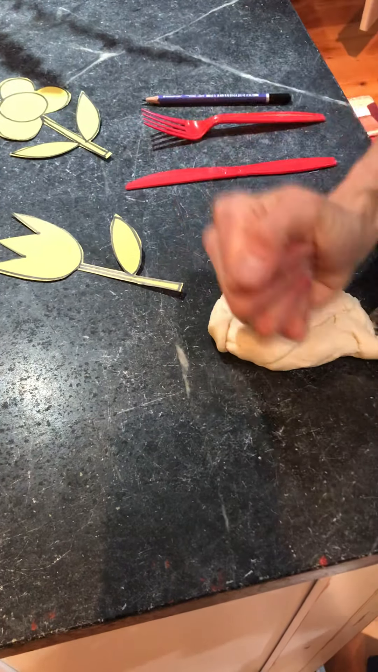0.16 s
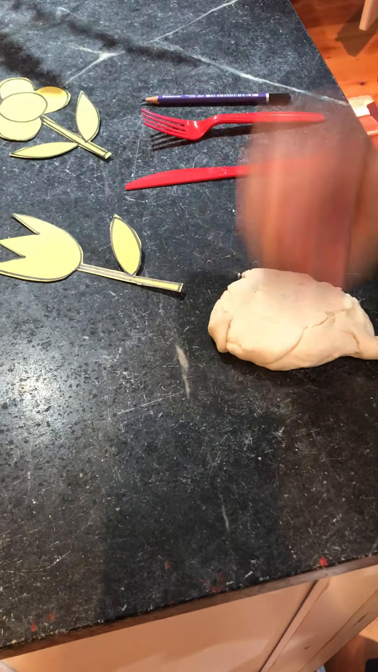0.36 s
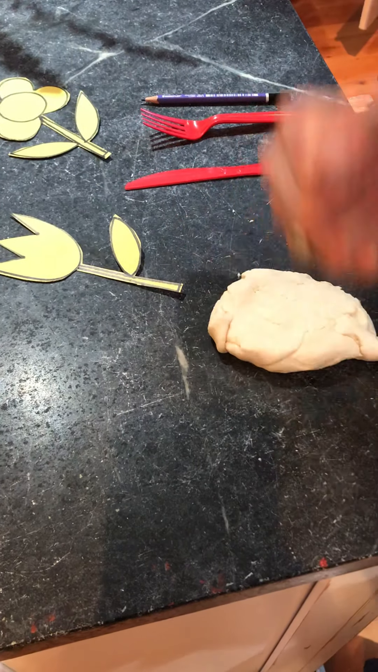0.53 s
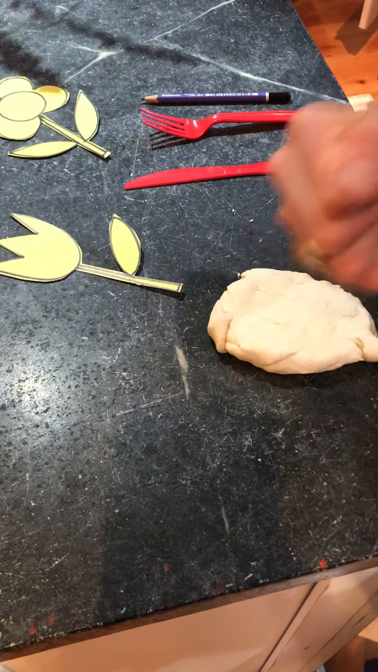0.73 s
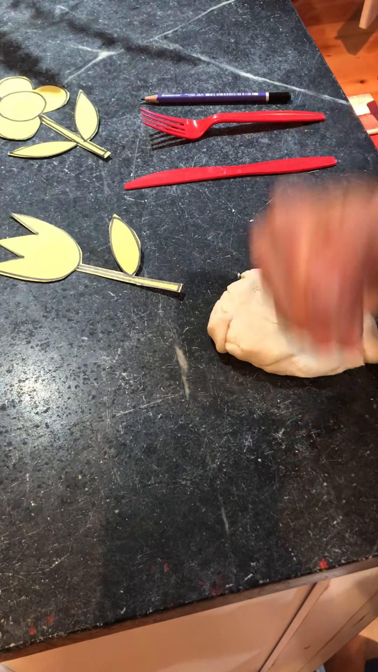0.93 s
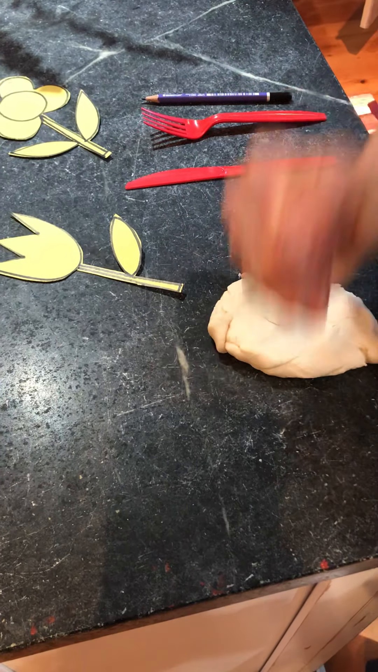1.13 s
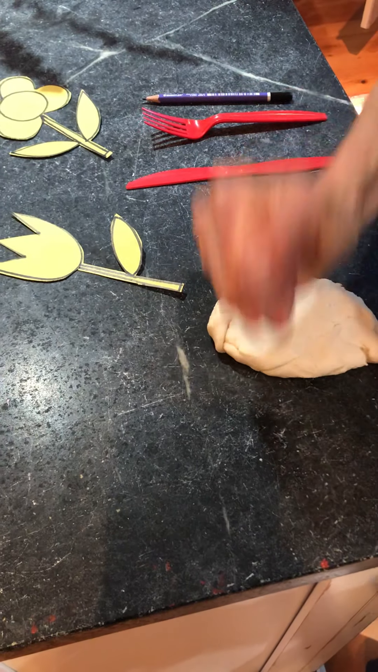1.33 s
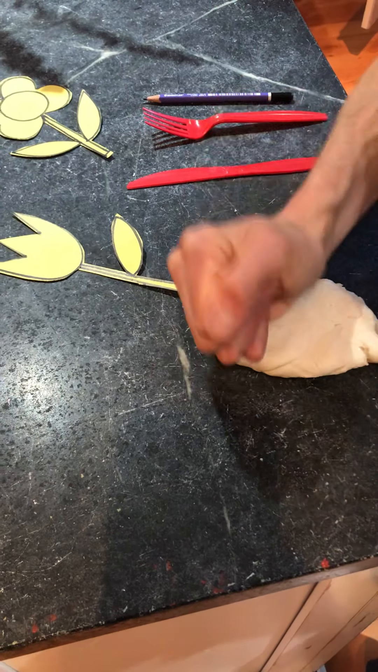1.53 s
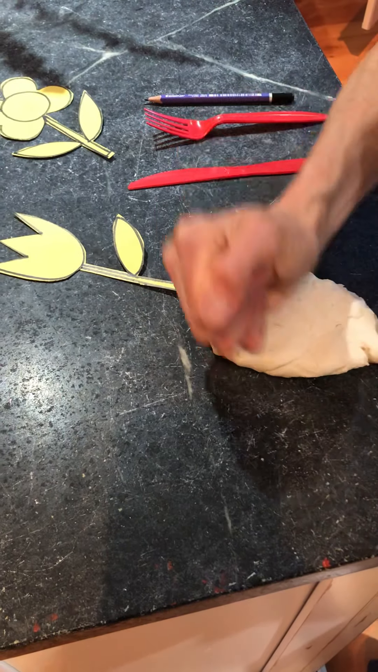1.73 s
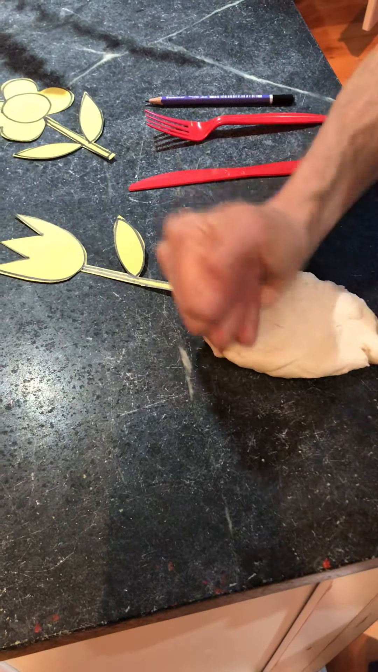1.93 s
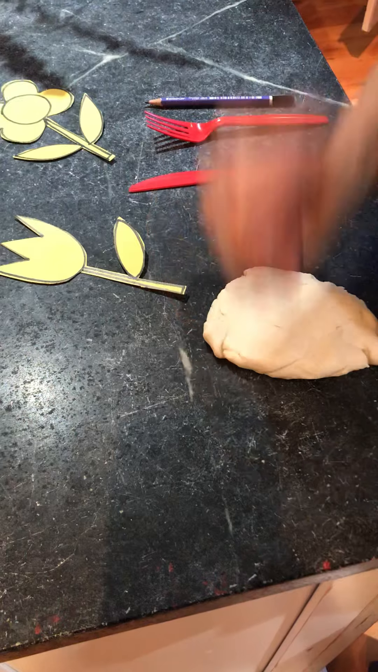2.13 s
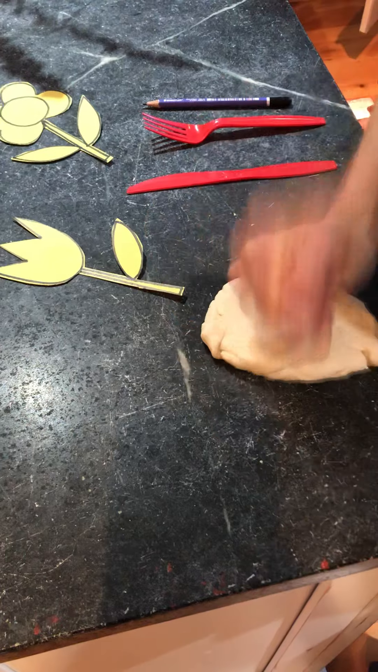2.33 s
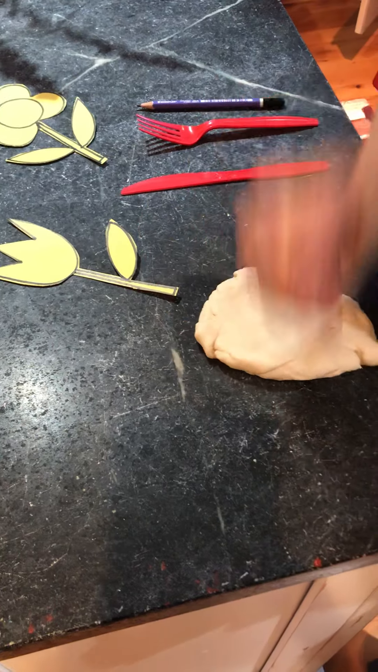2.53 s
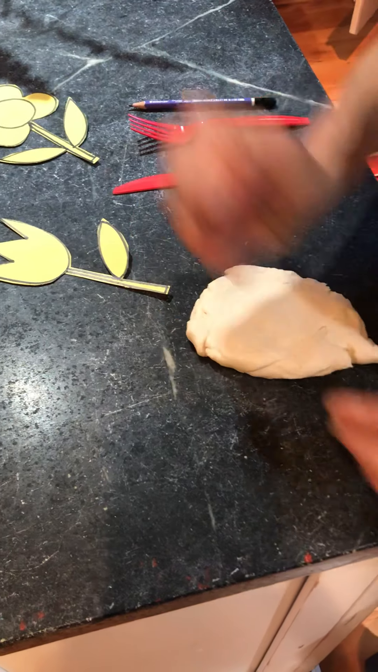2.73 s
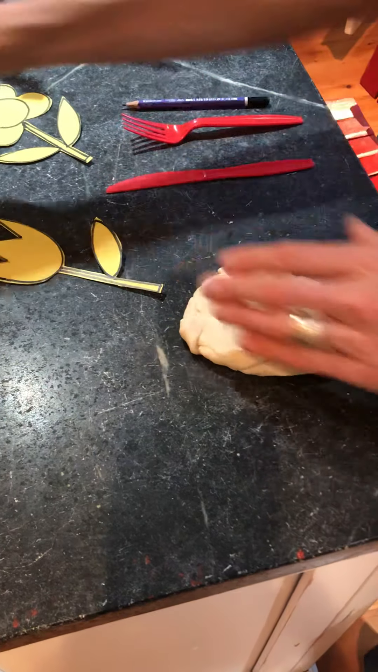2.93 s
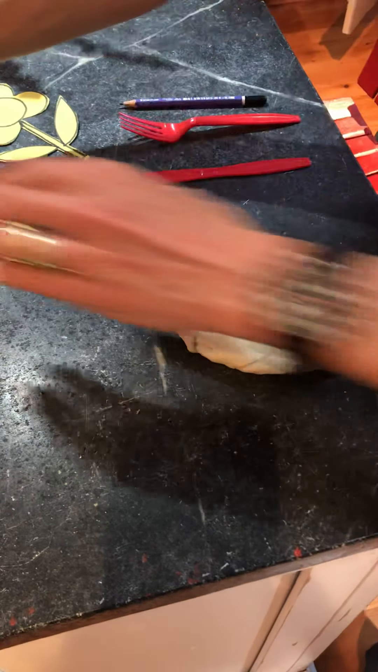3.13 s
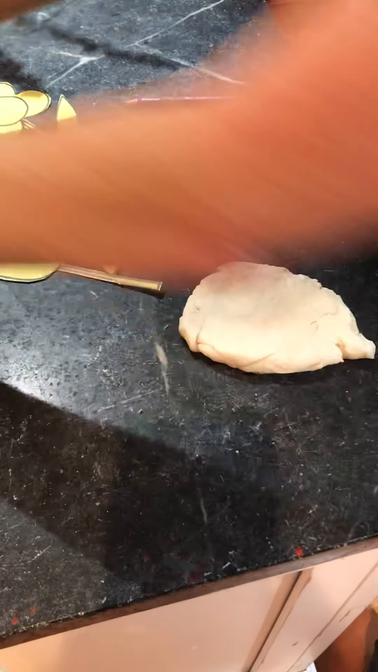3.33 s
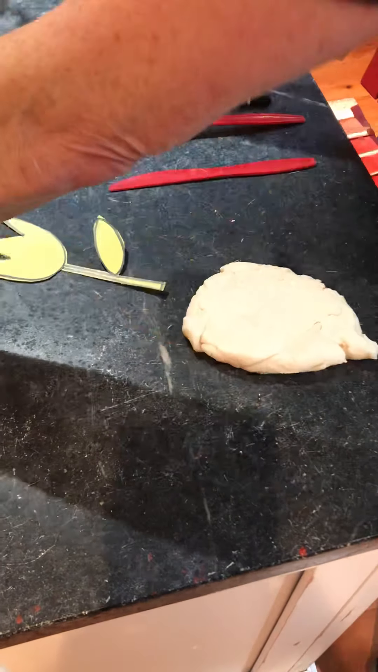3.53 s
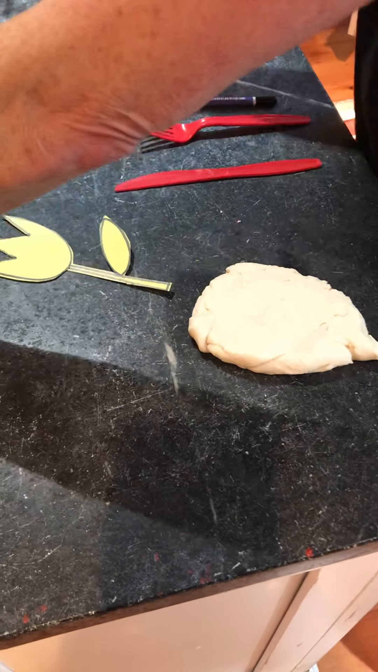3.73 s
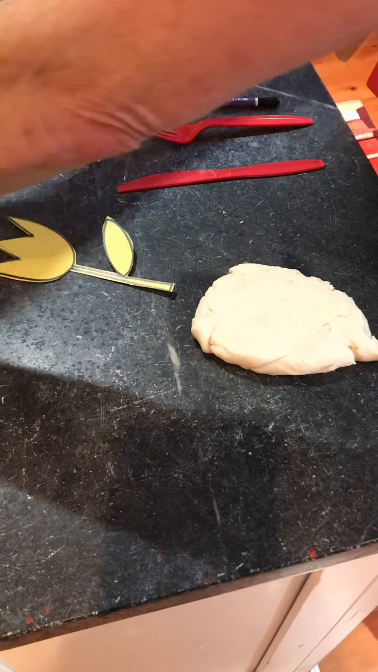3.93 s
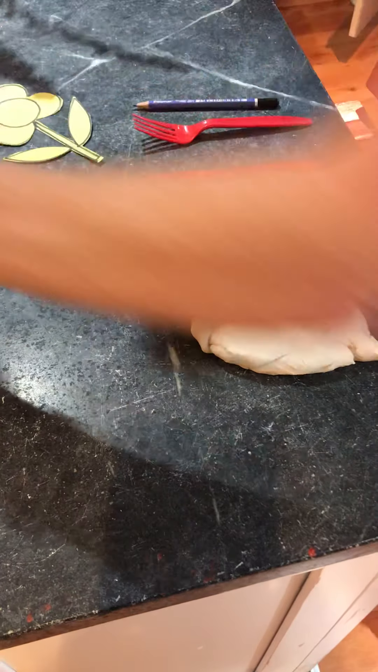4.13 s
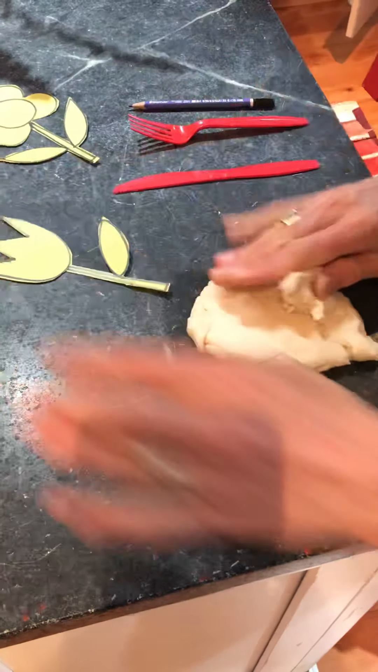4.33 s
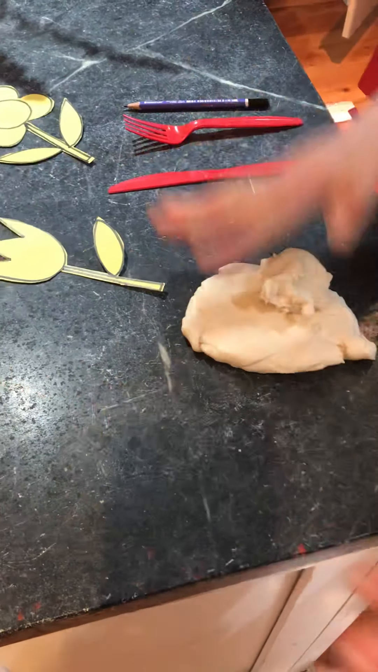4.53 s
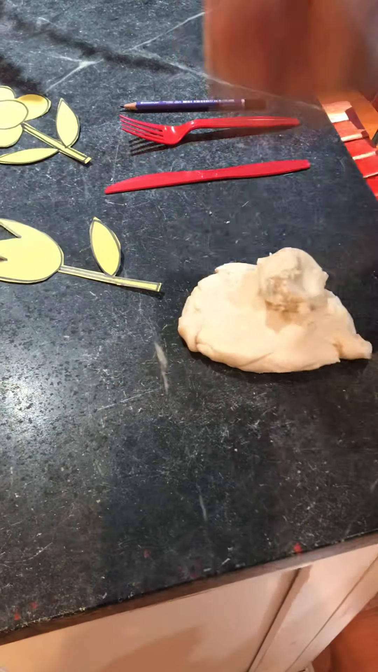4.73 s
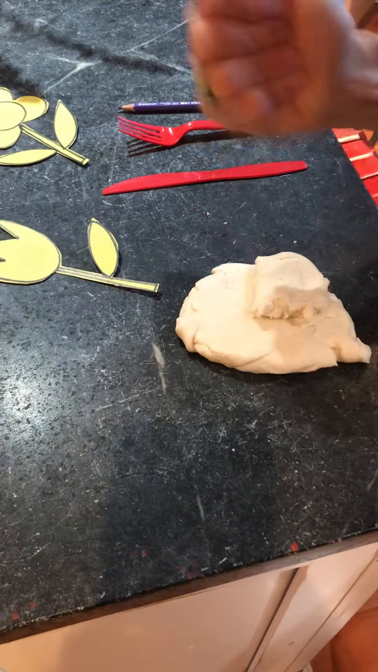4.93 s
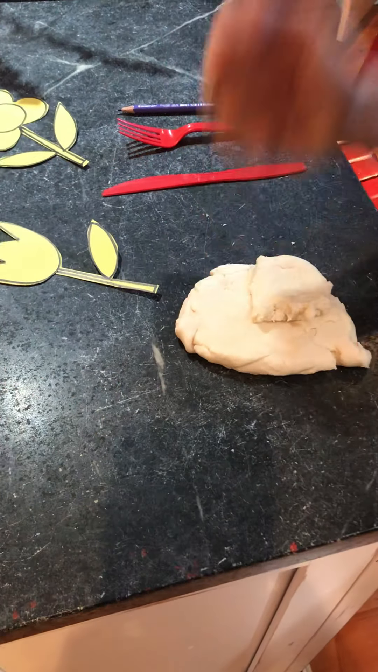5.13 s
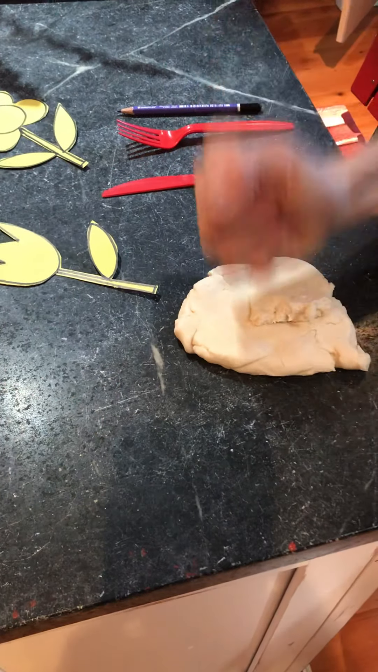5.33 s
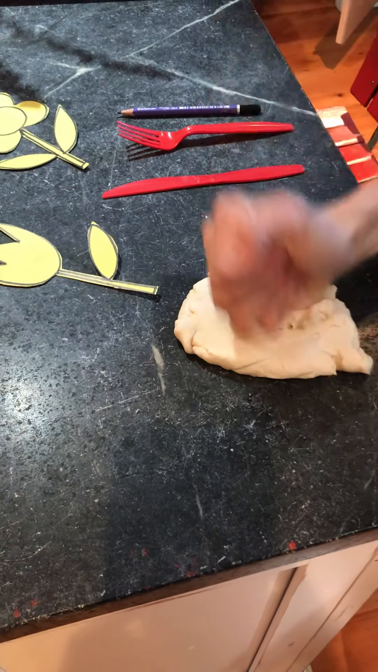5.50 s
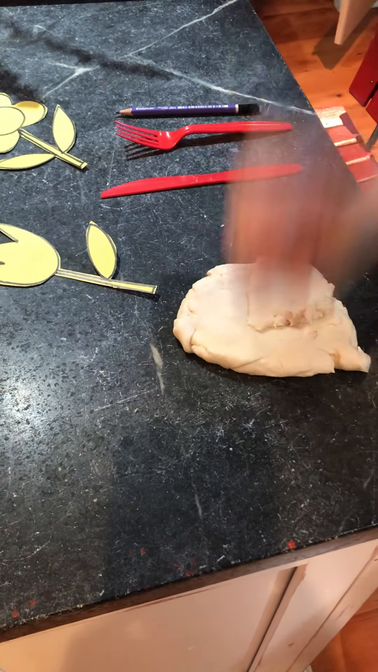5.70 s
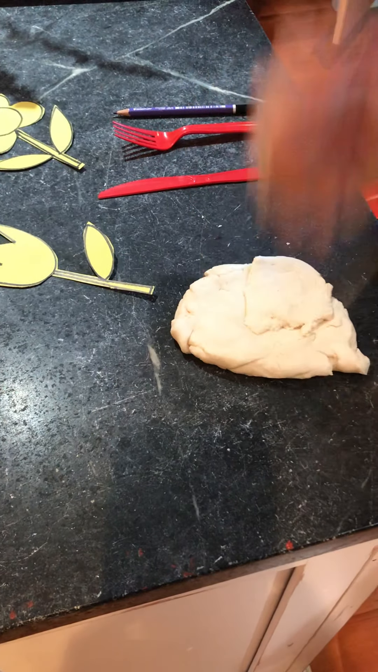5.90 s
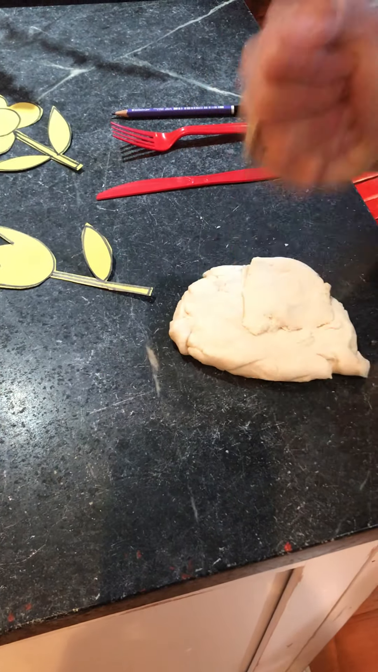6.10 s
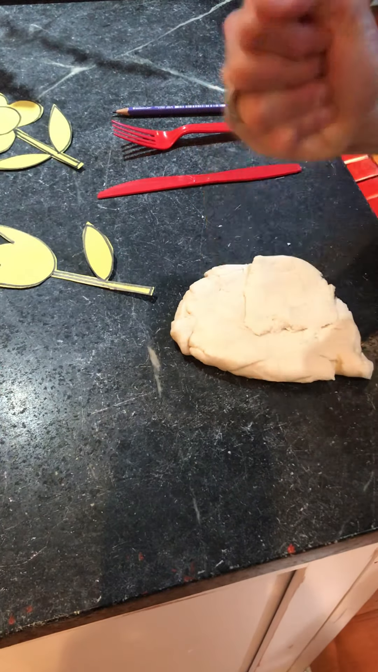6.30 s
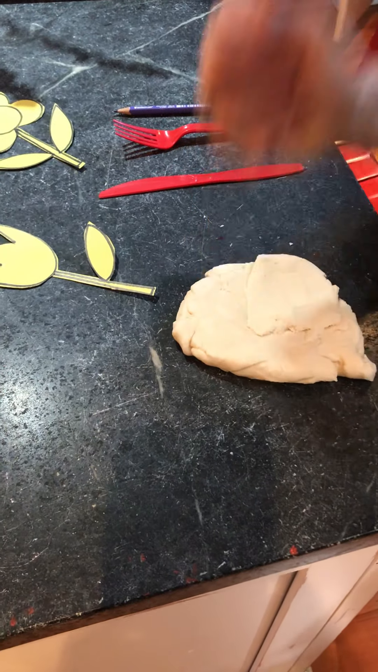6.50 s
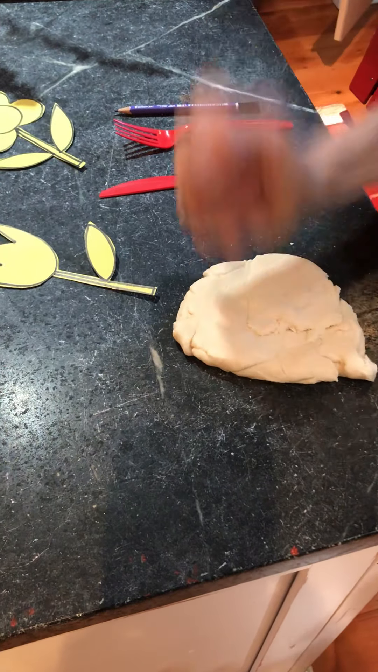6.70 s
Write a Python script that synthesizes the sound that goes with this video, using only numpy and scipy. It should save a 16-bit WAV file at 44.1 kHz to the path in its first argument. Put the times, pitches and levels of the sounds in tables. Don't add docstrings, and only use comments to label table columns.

```python
import sys
import numpy as np
from scipy import signal
from scipy.fft import rfft, irfft
from scipy.io import wavfile
from scipy.ndimage import uniform_filter1d

SR = 44100
rng = np.random.default_rng(int(sys.argv[2]) if len(sys.argv) > 2 else 0)


def ratio(d):
    e = np.asarray(d, float) / 20
    return 10 ** e


def waveform_to_disk(signal):
    frames = np.transpose(np.atleast_2d(signal))
    scaled = np.clip(frames, -1, 1) * 32767
    samples = np.round(scaled).astype(np.int16)
    wavfile.write(sys.argv[1], SR, samples)


N = 302261

# start in seconds, push in dB, skin slap in dB, squeezed air in dB,
# pitch of the hand's hollow in Hz.
PATS = [(0.13, 3.5, -35, -35, 1990), (0.1479, -3, -23.5, -33.5, 1130), (0.377, 4.2, -22, -24.5, 2040),
        (0.6012, 2.6, -24, -27, 2000), (0.829, 2.2, -21.5, -33, 1200), (1.0499, -1, -23.5, -41.5, 1140),
        (1.273, -2, -23.5, -30, 1020), (1.4834, -1.5, -19.5, -29.5, 1090), (1.704, 1, -14, -20, 1070),
        (1.92, 0, -22.5, -36.5, 890), (2.144, -4, -17.5, -29.5, 953), (2.3532, 2.1, -23.5, -27.5, 1280),
        (2.5688, -1.5, -24, -29, 1190), (4.7598, 3, -35, -42, 1060), (4.7644, -14, -34.5, -38, 905),
        (5.0089, 12, -22.5, -32, 1110), (5.2503, 7.5, -16.5, -21.5, 1060), (5.4988, 9, -18, -25, 830),
        (5.7346, 1.5, -24, -36.5, 950), (5.961, 3.5, -20, -22, 1190), (6.1761, 4, -12.5, -28, 1070),
        (6.3908, 1.5, -14, -22, 1100), (6.619, -1.5, -9.5, -27, 1190), (6.8493, 2, -2, -19.5, 1510)]
# contact time in ms, brightest frequency in Hz,
# first touch in dB, room share in dB.
SKIN = [(5.2, 5600, -14, -3), (7.2, 4300, -36, -9.5), (5.17, 5100, -38, -6.5), (4.8, 11000, -35, -3),
        (4.34, 10000, -22, -5), (3.87, 11500, -34, -3.5), (3.54, 4200, -17, -3), (3.75, 9000, -24, -9.5),
        (3.62, 6000, -24, -11.5), (3.9, 7000, -37, -9.5), (3.03, 9800, -57, -10.5), (3.9, 6960, -43, -4),
        (3.31, 10700, -24, -11), (5.27, 4700, -29, -1.5), (3.3, 11000, -15, -16), (6.55, 3000, -40, -8.5),
        (4.77, 13400, -44, -10.5), (5.14, 6100, -17, -4), (4.15, 4600, -35, -6.5), (4.13, 2900, -23.5, -4),
        (3.97, 6900, -58, -9), (3.2, 4300, -22, -9.5), (2.88, 8000, -32, -11.5), (2.4, 6800, -48, -14)]


def evened(x):
    return x / np.sqrt(np.mean(x ** 2) + 1e-20)


def read(points, hz):
    f, value = np.transpose(points)
    return np.interp(np.log(hz + 1), np.log(f + 1), value)


def add(mix, s, sound):
    at = round(s * SR)
    sound = sound[max(-at, 0):]
    part = mix[max(at, 0):][:len(sound)]
    part += sound[:len(part)]


def coloured(x, points):
    gain = ratio(read(points, np.fft.rfftfreq(len(x), 1 / SR)))
    return irfft(rfft(x) * gain, len(x))


def levelled(x):
    z = rfft(x)
    return irfft(z / np.sqrt(uniform_filter1d(abs(z) ** 2, size=45)), len(x))


def below(x, hz):
    taps = signal.firwin(511, hz, window=("kaiser", 9), fs=SR)
    return signal.oaconvolve(x, taps, "same")


def resonate(x, hz, width):
    r = np.exp(-np.pi * width / SR)
    return 2 * signal.lfilter([1 - r], [1, -r * np.exp(2j * np.pi * hz / SR)], x).real


def drift(per_s):
    t = np.arange(N) / SR
    rates = np.geomspace(per_s / 10, per_s, num=12)
    return evened(sum(np.sin(2 * np.pi * (f * t + rng.random())) / np.sqrt(f) for f in rates))


def room(hz_db):
    # frequency in Hz, t60 in seconds.
    decay_times = [(500, 0.91), (1000, 0.46), (2000, 0.34), (5500, 0.23), (14600, 0.17)]
    hz, t, z = signal.stft(rng.standard_normal(SR // 3), SR, nperseg=128)
    decay = ratio(-60 * t / read(decay_times, hz)[:, None])
    tail = signal.istft(z * decay, SR, nperseg=128)[1]
    t = np.arange(len(tail)) / SR
    build_up = (t / 0.0048).clip(0, 1) ** 0.5
    echo = 0.6 * np.exp(-((t - .0135) / 0.0011) ** 2)
    tail = tail * (build_up + echo)
    return coloured(tail / np.linalg.norm(tail), hz_db)


def kitchen():
    # frequency in Hz, density in dB per Hz.
    air_colour = [(20, -74), (40, -17), (50, -10), (110, -5), (140, -19.5), (180, -11), (400, -20.5),
                  (600, -24.5), (800, -21), (1200, -25.5), (2000, -32), (4000, -39), (8000, -47),
                  (16000, -47.5)]
    # resonance in Hz, width in Hz, rms in dB.
    resonances = [(51.2, 10, -59), (69, 12, -58.5), (101.8, 24, -54), (169.5, 7.3, -66.5), (568, 51, -63.5),
                  (612, 50, -60.5), (699.6, 60, -60.5), (925, 49, -66), (1020, 120, -70)]
    # hum frequency in Hz, rms in dB, waver in dB.
    hum_tones = [(120, -53, 1), (50.6, -63, 4.5)]
    # time in seconds, rms in dB.
    whine_levels = [
        (0.0, -61.5),
        (1.5, -63),
        (3.03, -68),
        (3.38, -58),
        (3.81, -63.5),
        (4.58, -60.5),
        (4.75, -68),
        (5.3, -63),
        (6.85, -62.5),
    ]
    whine_hz, air_db = 1139, -50.5
    t = np.arange(N) / SR
    air = ratio(air_db + .5 * drift(2.2)) * evened(coloured(rng.standard_normal(N), air_colour))
    drone = np.zeros(N)
    for hz, width, db in resonances:
        held = resonate(resonate(rng.standard_normal(N), hz, width), hz, width)
        drone += ratio(db) * evened(held)
    hum = np.zeros(N)
    for hz, db, waver_db in hum_tones:
        hum += ratio(db + waver_db * drift(22.0)) * np.sin(2 * np.pi * hz * t + 0.1 * drift(1.4))
    whine_db = np.interp(t, *np.transpose(whine_levels)) + 1.2 * drift(12)
    whine = ratio(whine_db) * np.sin(2 * np.pi * whine_hz * t + 1.9 * drift(5.9))
    return air + drone + np.sqrt(2) * (hum + whine)


def rustle():
    # peak in seconds, level in dB, rise and fall in seconds over 20 dB, brightness 0-1.
    strokes = [(.058, -59, 0.19, 0.23, 0.046), (0.129, -56, 0.01, 0.0088, 0.45), (2.66, -61, .05, .04, .6),
               (2.75, -67, .3, .8, 0.38), (2.915, -59, 0.033, .13, 0.79), (3.1, -63.5, .07, 0.055, .4),
               (3.27, -64.5, 0.11, .3, 0.66), (3.41, -60.5, .4, .03, .8), (3.44, -49, 0.036, 0.11, 0.94),
               (3.76, -51, .15, 0.041, 0.75), (3.8, -62.5, .03, 0.85, 0.54),
               (3.95, -54.5, 0.025, 0.044, 0.66), (4.12, -67, .09, 0.15, 1), (4.33, -56, 0.069, .025, 0.97),
               (4.37, -63, .03, .2, .95), (4.5, -66, .04, .5, 0.46), (4.65, -65.5, .08, .13, 0.95),
               (4.852, -69, .06, .08, 0.68), (4.918, -60.5, .025, 0.064, 1)]
    # frequency in Hz, level in dB.
    dull = [(1500, 6), (3500, 7.5), (6000, 7), (9000, -12), (12000, -11), (16000, -1)]
    # frequency in Hz, level in dB.
    bright = [(1500, -40), (5000, -11), (8000, -5.5), (10500, -3.5), (13000, -6), (16000, -5.5)]
    unevenness = ratio(0.79 * evened(uniform_filter1d(rng.standard_normal(N), size=40)))
    slips = rng.standard_normal((2, N)) * unevenness
    snags = rng.exponential(1, N) * (rng.random(N) < 250 / SR)
    slips = slips * (1 + 14 * uniform_filter1d(snags, size=30))
    t, power = np.arange(N) / SR, np.zeros((2, N))
    for s, db, rise_s, fall_s, brightness in strokes:
        stroke = ratio(db - 20 * np.maximum((s - t) / rise_s, (t - s) / fall_s))
        share = np.clip(brightness, 0, 1)
        power = power + np.outer([1 - share, share], stroke ** 2)
    dull_part = np.sqrt(power[0]) * evened(coloured(slips[0], dull))
    return dull_part + np.sqrt(power[1]) * evened(coloured(slips[1], bright))


def swish():
    # start in seconds, length in seconds, rms in dB, first and last pitch in Hz, width in Hz.
    s, length, db, from_hz, to_hz, width = (2.9, .048, -64, 12500, 15600, 700)
    t, out = np.arange(round(length * SR)) / SR, np.zeros(N)
    glide_hz = from_hz + (to_hz - from_hz) * t / length
    turn = np.exp(2j * np.pi * np.cumsum(glide_hz) / SR)
    r = np.exp(-np.pi * width / SR)
    hiss = (turn * signal.lfilter([1 - r], [1, -r], rng.standard_normal(len(t)) / turn)).real
    add(out, s, ratio(db) * np.sin(np.pi * t / length) * evened(hiss))
    return out


def pushes():
    return [(s, db, contact_ms) for (s, db, *_), (contact_ms, *_) in zip(PATS, SKIN)]


def shake_db(push_db, contact_ms):
    panel_hz, panel_db = 215.4, -0.13
    return panel_db + push_db - 30 * np.log10(1 + (2 * np.pi * panel_hz * contact_ms / 1000) ** 2)


def ticks():
    # ring mode in Hz, level in dB, t60 in seconds.
    ring_modes = [(13700, 1, 0.047), (12600, -7, .04), (9300, -26, 0.03)]
    # frequency in Hz, level in dB.
    click_colour = [(3000, -39), (6500, -8), (9000, -4), (12000, -3.5), (16000, -10.5)]
    # time in seconds, click in dB, metal ring in dB.
    turns = [(0.0523, -47, -74), (0.3037, -50, -76), (0.5374, -58, -84), (0.7687, -54, -75),
             (0.9951, -52, -72), (1.2161, -51, -77), (1.433, -47.5, -72), (1.6511, -50, -75),
             (1.8642, -52, -76), (2.082, -48, -66), (2.2907, -51, -74), (2.5087, -48, -72),
             (2.7664, -54, -74), (4.9364, -51, -71), (5.173, -47, -59), (5.4106, -49, -67),
             (5.6444, -53, -75), (5.886, -54, -82), (6.113, -49, -78), (6.3435, -50, -76),
             (6.539, -50, -69), (6.762, -50, -78)]
    # time in seconds, click in dB, metal ring in dB.
    strays = [(2.6599, -50, -77), (2.701, -56, -79), (2.8115, -54, -72), (2.9607, -50, -66),
              (2.9772, -52, -74), (3.4382, -34, -62), (3.476, -40, -67), (3.6706, -49, -56),
              (3.7504, -49, -66), (3.9504, -48, -74), (3.9694, -60, -62), (4.1165, -56, -72),
              (4.2363, -54, -76), (4.3076, -50, -67), (4.371, -51, -74), (4.5032, -59, -73),
              (4.8524, -47, -72), (6.474, -54, -80), (6.5665, -50, -80), (6.788, -52, -72)]
    peel_s, peel_per_ms, peel_db, peel_ring_db = .087, -0.0034, -4, -26
    sticky_until_s = 5.4
    rebound_s, rebound_db, rebound_scatter_db = .016, -7.5, 1
    t, out = np.arange(2048) / SR, np.zeros(N)
    ring = sum(ratio(db - 60 * t / t60) * np.sin(2 * np.pi * hz * t) for hz, db, t60 in ring_modes)
    ring = ring * (1 - np.exp(-t / .002))
    rows = []
    for s, push_db, contact_ms in pushes():
        if s < sticky_until_s:
            db = shake_db(push_db, contact_ms) + peel_db
            rows.append((s + peel_s + peel_per_ms * contact_ms, db, db + peel_ring_db))
    for s, db, ring_db in turns:
        scatter_db = rebound_scatter_db * rng.standard_normal()
        rows.append((s, db, ring_db))
        rows.append((s + rebound_s, db + rebound_db + scatter_db, ring_db + rebound_db))
    rows += list(strays)
    for (s, db, ring_db), noise in zip(rows, rng.standard_normal((len(rows), len(t)))):
        click = coloured(noise * np.exp(-t / 0.0023), click_colour)
        add(out, s, ratio(db) * click / abs(click).max() + ratio(ring_db) * ring)
    return out


def knocks():
    # start in seconds, level in dB, pitch in Hz, t60 in seconds.
    knuckles = [
        (4.762, -32, 271, 0.084),
        (0.064, -39.5, 217, 0.05),
    ]
    t, out = np.arange(SR // 8) / SR, np.zeros(N)
    for s, db, hz, t60 in knuckles:
        add(out, s, ratio(db - 60 * t / t60) * (1 - np.exp(-t / 0.0047)) * np.sin(2 * np.pi * hz * t))
    return out


def pops():
    # frequency in Hz, level in dB.
    panels = [(90, 0), (170, 3), (230, -4), (290, -9.5), (315, -1.5), (400, -23), (600, -5.5), (720, -11.5),
              (850, -24.5), (1300, -27.5), (2500, -49)]
    t, out = np.arange(SR // 2) / SR, np.zeros(N)
    noises = rng.standard_normal((len(PATS), 2, len(t)))
    for (s, push_db, _, db, hz), (contact_ms, *_), noise in zip(PATS, SKIN, noises):
        puff = (1 + 3.6 * noise[0, :512]) * np.exp(-t[:512] / 0.00038)
        pop = resonate(resonate(puff, hz, 0.25 * hz), 1.72 * hz, 1.83 * hz)
        pop = ratio(db) * pop / abs(pop).max()
        add(out, s + 0.00072, pop)
        tail = room([(0.2 * hz, -12), (hz, 8), (1.6 * hz, 3), (10.0 * hz, -20)])
        add(out, s, ratio(-4) * np.linalg.norm(pop) * tail)
        flutter_db = 3.78 * evened(uniform_filter1d(noise[0], size=400))
        rattle = ratio(shake_db(push_db, contact_ms) - 60 * t / 0.97 + flutter_db)
        add(out, s, rattle * (1 - np.exp(-t / 0.003)) * evened(coloured(noise[1], panels)))
    return out


def slaps():
    # frequency in Hz, level in dB.
    crack_colour = [(1500, -7), (3100, 0), (4200, -1), (5500, 0), (8000, -1), (10500, 1.5), (13000, -3),
                    (16000, -7)]
    spread_ms, spread_per_slap_db = 2.65, 0.04
    thin_db_per_slap_db, soft_slap_db = -0.33, -26.5
    t, dry, wet = np.arange(1024) / SR, np.zeros(N), np.zeros(N)
    noises = rng.standard_normal((len(PATS), 2, len(t)))
    for (s, _, db, *_), (_, hz, touch_db, room_db), noise in zip(PATS, SKIN, noises):
        length_ms = spread_ms + spread_per_slap_db * db
        u = np.maximum(t - .003, 0) / (length_ms / 1000)
        first_touch = ratio(touch_db) * (t > .001) * (t < .003)
        landing = np.exp(-u / 0.12) + 0.25 * np.exp(-u ** 2) + 0.065 * np.exp(-u / 1.2)
        shape = first_touch + (u / 0.07).clip(0, 1) * landing
        patches = ratio(3.5 * evened(uniform_filter1d(noise[1], size=14)))
        crack = coloured(levelled(noise[0] * shape * patches), crack_colour)
        thin_db = thin_db_per_slap_db * max(db - soft_slap_db, 0)
        crack = coloured(crack, [(3300, thin_db), (4200, 0)])
        crack = crack + 0.4 * resonate(crack, hz, 1800)
        crack = ratio(db) * crack / abs(crack).max()
        add(dry, s - .0025, crack)
        tail = room(crack_colour)
        tail = tail + 0.61 * resonate(tail, hz, 2700)
        add(wet, s, ratio(room_db) * np.linalg.norm(crack) * tail)
    return dry, wet


def thumps():
    # frequency in Hz, level in dB, t60 in seconds,
    # sign at the listening point.
    counter_modes = [(38.2, -29.5, 0.64, 1), (49.5, -16.5, 0.395, -1), (57.2, -10.8, 0.329, 1),
                     (66.1, -20.8, 0.265, -1), (88.3, -12.0, 0.268, -1), (98.3, -5.9, 0.329, 1),
                     (111.9, -7.3, 0.607, -1), (136.8, -1.6, 0.25, -1), (145.5, 3.5, 0.22, 1),
                     (160.4, -0.7, 0.321, -1), (171.7, 22.1, 0.138, 1), (173.2, 22.6, 0.1, -1),
                     (197.2, -1.3, 0.265, 1), (217.8, -9.9, 0.64, 1), (247.5, -7.9, 0.49, 1),
                     (273.4, -2.3, 0.215, -1), (313.2, -7.0, 0.512, -1), (332.3, -6.4, 0.274, 1)]
    # time in seconds, level in dB, contact time in ms.
    earlier_push = (-0.0886, 1.5, 6.4)
    t, out = np.arange(SR // 2) / SR, np.zeros(N)
    modes = np.zeros(len(t))
    for hz, db, t60, sign in counter_modes:
        modes += sign * ratio(db - 60 * t / t60) * np.sin(2 * np.pi * hz * t)
    for s, db, contact_ms in [earlier_push] + pushes():
        u = t[:SR // 10] / (contact_ms / 1000)
        force = u ** 2 * np.exp(-u)
        add(out, s, ratio(db) * signal.fftconvolve(modes, force / force.sum()))
    return out


def scene():
    edge_hz, attack_edge_hz = 15800, 16800
    dry, wet = slaps()
    steady = thumps() + knocks() + pops() + ticks() + wet + rustle() + kitchen() + swish()
    return (below(dry, attack_edge_hz) + below(steady, edge_hz))[None]


def band_limit(x):
    return signal.sosfilt(signal.butter(12, 17050, fs=SR, output="sos"), x)


def record(dry):
    # frequency in Hz, level in dB.
    mic_colour = [(9600, 0), (10400, -5.5), (11000, -2.5), (12000, 0), (13000, 2.5), (13800, 0)]
    heard = coloured(np.pad(dry[0], (0, 4096)), mic_colour)[:N]
    return band_limit(heard[None])


dry = scene()
out = record(dry)
waveform_to_disk(out)
```